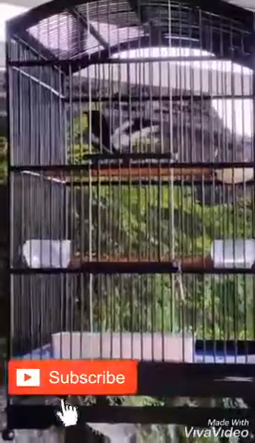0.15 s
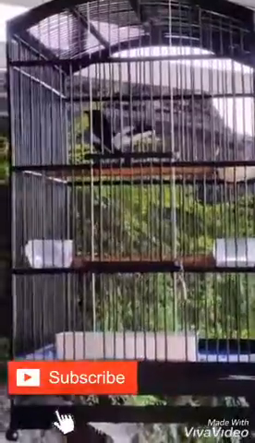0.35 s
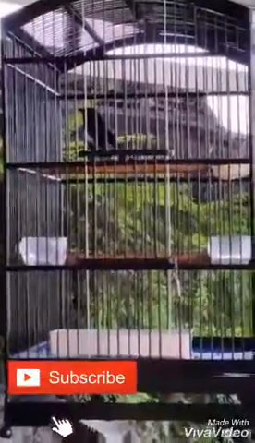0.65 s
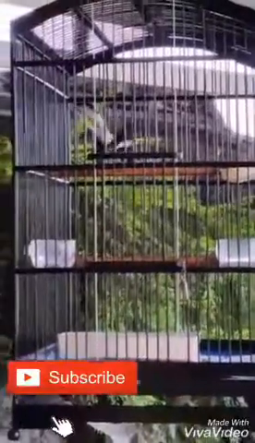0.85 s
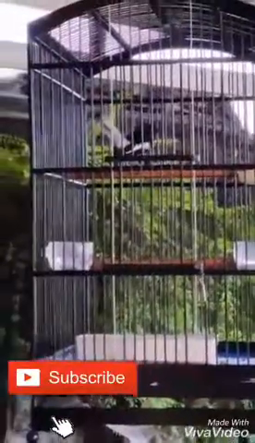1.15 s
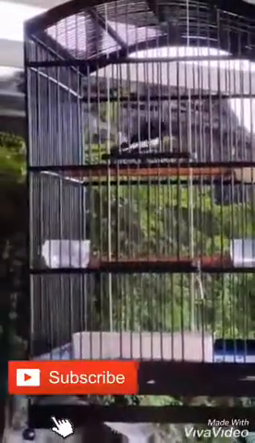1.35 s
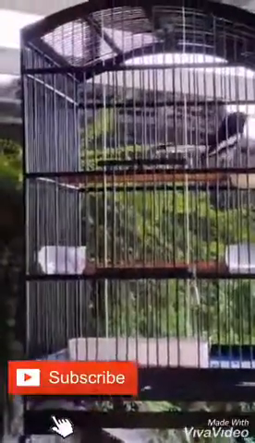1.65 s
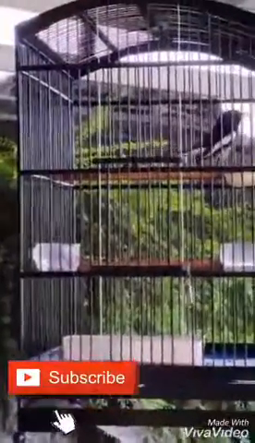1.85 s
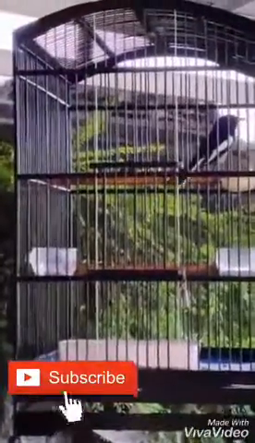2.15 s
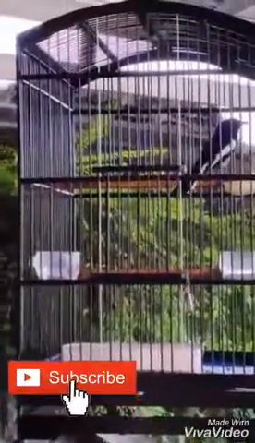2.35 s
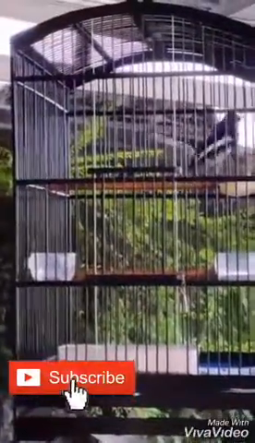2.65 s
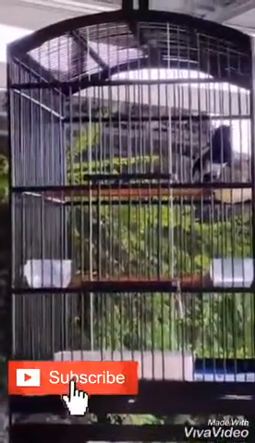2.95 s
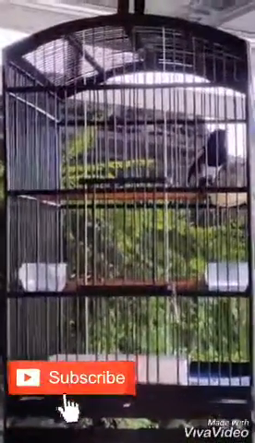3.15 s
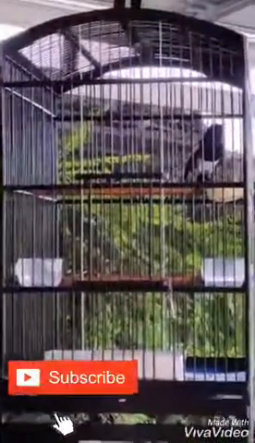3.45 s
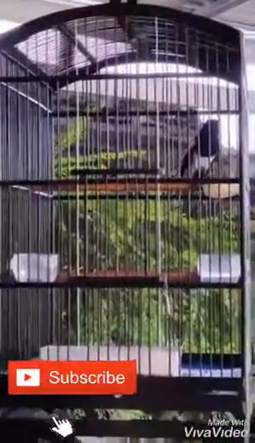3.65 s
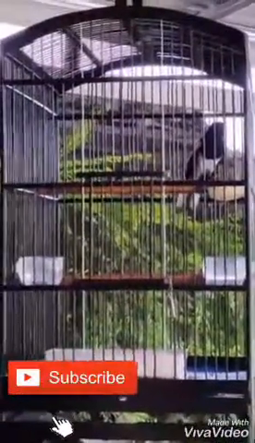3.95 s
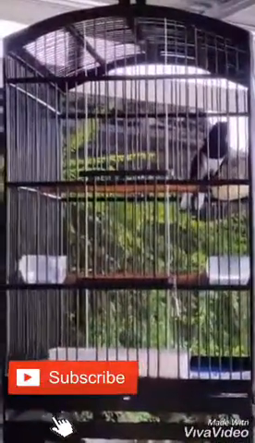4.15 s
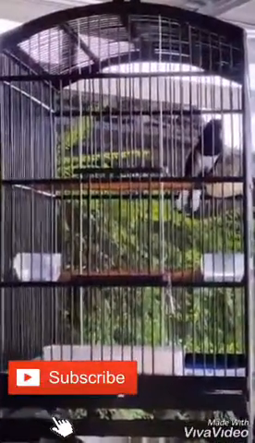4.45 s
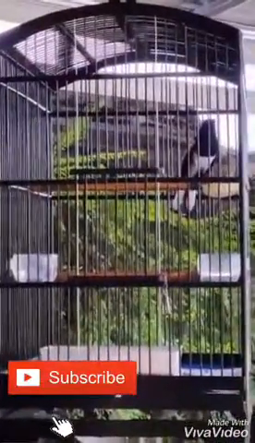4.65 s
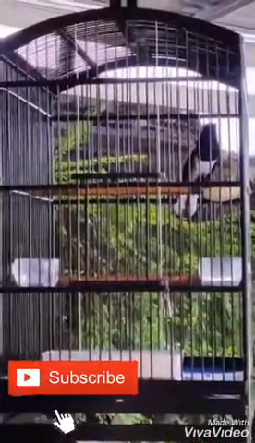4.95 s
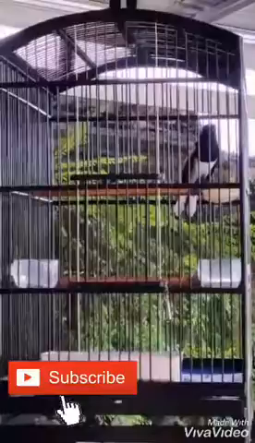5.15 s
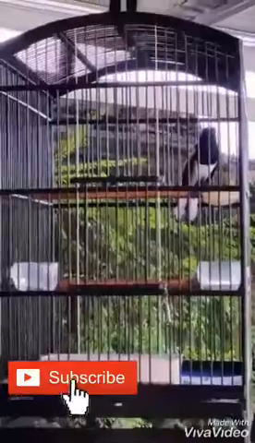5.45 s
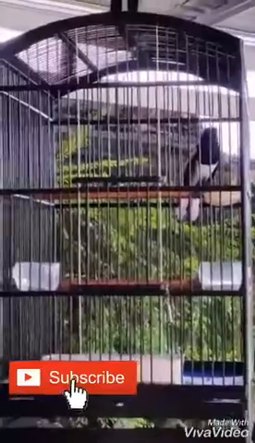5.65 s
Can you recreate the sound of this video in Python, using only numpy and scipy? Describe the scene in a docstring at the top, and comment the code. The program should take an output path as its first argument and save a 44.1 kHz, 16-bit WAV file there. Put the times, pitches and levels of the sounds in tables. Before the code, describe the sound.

A caged songbird on a porch rustles its feathers faintly and gives two soft, hoarse calls. It then sings a quick whistled phrase, a sharp chip and a long high squeal that breaks into a rasp. Two falling slurs and a loud rising whistle follow. Hard walls add a short echo, and a faint low outdoor rumble sinks away in the pauses.

```python
"""A caged songbird sings on a hard-walled porch: a whistled phrase, a sharp chip, a long squeal that
breaks into a rasp, two falling slurs and a rising whistle that ends on two notes at once. Membranes in
its syrinx vibrate and let out puffs of air; in the last note both sides sound and modulate each other.
Two hoarse calls precede the song. Behind it are soft feather rustles, faint, far drawn-out tones and
a low outdoor rumble; a noise suppressor turns the pauses down."""
import sys
import numpy as np
from scipy import signal
from scipy.fft import rfft, irfft, next_fast_len
from scipy.io import wavfile
from scipy.ndimage import uniform_filter1d, minimum_filter1d, map_coordinates

SR = 44100
rng = np.random.default_rng(int(sys.argv[2]) if len(sys.argv) > 2 else 0)


def to_wav(s):
    """Save 16-bit WAV."""
    ch = np.atleast_2d(s).T  # columns
    pcm = np.round(np.clip(ch, -1, 1) * 32767)  # PCM
    wavfile.write(sys.argv[1], SR, pcm.astype(np.int16))


N = 255780
TOP_HZ = 15600

# Clear notes (start [s], length [s], onset [Hz], aim [Hz], end [Hz], level [dB], swell [dB],
# overtones [dB], rasp [0-1])
WHISTLES = [ (1.992, .106, 2485, 3430, 3310, -30, -6.5, -23.5, 0.08),
            (2.15, .11, 2248, 2790, 2569, -23, 1.5, -38.5, 0.13),
            (2.258, .088, 2340, 4338, 4094, -23, -3, -21, .07),
            (2.425, .114, 3337, 3355, 2678, -19.5, 3, -31.5, .18),
            (2.524, .06, 2660, 2248, 2200, -25.5, -1.5, -35, 0.29),
            (5.162, .05, 1500, 1650, 2800, -39, 16, -16, .2),
            (5.196, .134, 2450, 2900, 3280, -25, -3, -15, .08),
            (5.322, .078, 3343, 3582, 3696, -16.5, 5.5, -26.5, 0.03),
            (5.387, .056, 3675, 3654, 3614, -25, -11, -28.5, 0.07), ]
# Three-part chip and two falling slurs (columns as WHISTLES)
CHIPS = [ (3.241, .072, 3900, 5820, 5540, -27, -3, -2, 0.22),
         (3.272, .064, 3300, 4350, 4600, -31, 6, -6, .4),
         (3.304, .032, 5000, 3050, 2506, -29.5, -9.5, -12, 0.79),
         (4.926, 0.069, 6710, 5380, 4055, -29, 5, -8, .09),
         (5.012, .06, 6650, 5556, 3806, -22.5, -9.5, -4.5, .09), ]
# Harsh steps up into the squeal and down out of it (columns as WHISTLES)
RASP_STEPS = [ (3.742, .056, 1196, 1219, 1253, -36, 9, 23, 0.83),
              (3.79, .038, 1476, 1571, 1683, -34, -0.5, 6, .3),
              (3.821, 0.059, 1786, 2266, 2198, -27, 0, 1.5, 0.5),
              (4.243, .09, 2694, 2255, 2192, -25, 1, 1, .28),
              (4.24, .118, 2881, 2690, 2431, -30, -2, -6, .25),
              (4.342, .095, 2011, 1990, 1943, -27.5, -6, 11.5, 0.27),
              (4.382, .075, 2402, 2357, 2286, -32, -7, -5.5, .2),
              (4.443, 0.069, 1716, 1601, 1505, -32.5, 0, 10, .4),
              (4.499, 0.082, 1042, 1080, 1049, -33, -6.5, 20, 0.5), ]
def songbird():
    """The song: clear whistles, shaky chips, harsh steps, the squeal and a two-voiced close."""
    song = sum(syrinx(glide(row, attack_s=.026, release_s=.017), jitter=.05, tremor=.0047,
                      slope_db=-9.5, hiss_db=-8, sizzle_db=-18) for row in WHISTLES)
    song += sum(syrinx(glide(row, attack_s=.02, release_s=.013), jitter=.08, jitter_hz=1400,
                       slope_db=-7.5, hiss_db=-8, sizzle_db=-4) for row in CHIPS)
    song += sum(syrinx(glide(row, attack_s=.0092, release_s=.016), jitter=.03,
                       slope_db=-9, hiss_db=-1, sizzle_db=-19.5) for row in RASP_STEPS)
    return song + squeal() + two_voices()


# Squeal contour (time [s], pitch [Hz], level [dB], overtones [dB])
SQUEAL = [(3.88, 2709, -25.5, 1.2), (3.915, 2747, -24, 6), (3.95, 2813, -21.5, 6.5), (4.0, 2852, -26, 2.5),
          (4.061, 2898, -21, -3), (4.121, 2894, -20.5, -14.5), (4.165, 2854, -17.8, -15),
          (4.201, 2840, -22.5, -16), (4.25, 2855, -24, -14)]
def squeal(bright_db=2.5, mid_rasp=.04, edge_rasp=.34):
    """A long pressed note, cleanest in the middle; at first its octave rivals its fundamental."""
    times, *columns = np.transpose(SQUEAL)
    t = np.arange(int(times[0] * SR), int(times[-1] * SR)) / SR
    pitch, db, overtones_db = (np.interp(t, times, column) for column in columns)
    rasp = mid_rasp + edge_rasp * np.linspace(-1, 1, len(t)) ** 2
    return syrinx((t, pitch, db, overtones_db + bright_db, rasp), tremor=.0034, hiss_db=-6, sizzle_db=-28)


# Closing note, one row per side of the syrinx (columns as WHISTLES)
TWO_VOICES = [(5.441, .05, 3550, 3950, 3990, -17, 0, -30.5, 0.14),
              (5.439, 0.043, 3130, 3060, 3070, -24.5, -3, -16.5, 0.2)]
def two_voices(quadratic_db=14, cubic_db=27):
    """Both sides of the syrinx modulate each other, adding sum and difference tones."""
    first, second = (syrinx(glide(row, attack_s=.02, release_s=.013), hiss_db=-3.5) for row in TWO_VOICES)
    products = first * second * (amp(quadratic_db) + amp(cubic_db) * (first + second))
    colour = [(1000, -29), (2200, 2), (4800, 1), (7000, -.5), (11000, -4.5)]
    return first + second + coloured(products, colour)


# Throat colour of the overtones (frequency [Hz], gain [dB])
THROAT = [(1000, -15), (2000, -11), (3000, -1), (4300, 6.5), (5700, -0.5), (7000, -3), (8500, -12.5),
          (11000, -14), (13300, -9), (15000, -22.5)]
# Rasp noise (frequency [Hz], relative density [dB])
HISS = [(200, -46.5), (1200, -23), (2300, 2.5), (4300, -3), (6500, -14), (9000, -13), (12500, -4.5),
        (16000, -17)]
# Treble noise of pressed notes (frequency [Hz], relative density [dB])
SIZZLE = [(3000, -41.5), (7000, -23), (8700, 1), (11000, 1.5), (13200, 3), (15000, -13)]
def syrinx(controls, jitter=.035, jitter_hz=700, tremor=.0033, shimmer_db=6,
           slope_db=-11, hiss_db=-3, sizzle_db=-25):
    """One note of a vibrating membrane; rasp shakes its pitch and strength and admits pulsed noise."""
    t, pitch, db, overtones_db, rasp = controls
    rasp = np.clip(rasp, 0, 1)
    unsteady = tremor * wobble(250, len(t)) + jitter * rasp * wobble(jitter_hz, len(t))
    phase = 2 * np.pi * np.cumsum(pitch * (1 + unsteady)) / SR
    k = np.arange(2, 15)[:, None]
    gains = amp(overtones_db + slope_db * np.log2(k / 2) + along(THROAT, k * pitch))
    gains *= k * pitch < TOP_HZ
    overtones = np.sum(gains * np.sin(k * phase), axis=0)
    overtone_power = np.sum(gains ** 2, axis=0)
    tone = (np.sin(phase) + overtones) / np.sqrt((1 + overtone_power) / 2)
    flutter = amp(shimmer_db * rasp * wobble(400, len(t)))
    puffs = rng.standard_normal((2, len(t))) * (1 + np.sin(phase))  # air escapes once a cycle
    hiss = amp(hiss_db) * rasp ** 2 * unit(coloured(puffs[0], HISS))
    pressed = np.sqrt(overtone_power / (1 + overtone_power))
    sizzle = amp(sizzle_db) * pressed * unit(coloured(puffs[1], SIZZLE))
    voice = flutter * (tone + sizzle) + hiss
    return placed(gate(t, fade_s=.0026) * amp(db) * voice, t)


def glide(row, attack_s, release_s, scoop_s=.014, edge_rasp=.22):
    """Syrinx controls: a scoop from onset to aim, a slide to the end pitch, roughest at the edges."""
    start, length, onset_hz, aim_hz, end_hz, db, swell_db, overtones_db, rasp = row
    t, u, edges_db = syllable(start, length, attack_s, release_s)
    scoop_hz = (onset_hz - aim_hz) * np.exp(-(t - start) / scoop_s)
    pitch = aim_hz + (end_hz - aim_hz) * u + scoop_hz
    level_db = db + swell_db * (u - .5) + edges_db
    return t, pitch, level_db, overtones_db, rasp + edge_rasp * (2 * u - 1) ** 2


# Hoarse calls (start [s], length [s], level [dB])
HOARSE_CALLS = [(.508, .112, -36), (1.299, .104, -37.5)]
# Their colour (frequency [Hz], gain [dB])
HOARSE_COLOUR = [(300, -30), (700, -43.5), (950, 9.5), (1200, 10.5), (1600, 10.5), (2000, 7.5), (2600, 1),
                 (3300, -18), (4500, -32.5), (7000, -37.5), (12000, -21), (16000, -50.5)]
def hoarse_call(start, length, db, start_hz=863, end_hz=799, overtones_db=10, rasp=.39, end_rasp=.85):
    """A soft, low call that sags in pitch and grows harsher."""
    t, u, edges_db = syllable(start, length, attack_s=.04, release_s=.034)
    pitch = start_hz + (end_hz - start_hz) * u
    controls = t, pitch, db + edges_db, overtones_db, rasp + (end_rasp - rasp) * u
    voice = syrinx(controls, jitter=.0998, jitter_hz=500, slope_db=-5, hiss_db=0)
    return coloured(voice, HOARSE_COLOUR)


# Hops and wing settling (start [s], length [s], level [dB], fade [dB])
RUSTLES = [(0, 0.29, -59, -20), (1.528, .4, -64, -15.5)]
# Feather noise (frequency [Hz], relative density [dB])
FEATHERS = [(300, -6.5), (900, 4), (2500, -2), (4500, -12.5), (9000, -20.5), (15000, -23.5)]
def rustle(start, length, db, fade_db, flicker_db=2):
    """A soft, flickering brush of feathers that dies away."""
    t, u, edges_db = syllable(start, length, attack_s=.008, release_s=.05)
    noise = unit(coloured(rng.standard_normal(len(t)), FEATHERS))
    level_db = db + fade_db * u + edges_db + flicker_db * wobble(40, len(t))
    return placed(noise * amp(level_db), t)


# Far calls (start [s], length [s], start [Hz], middle [Hz], end [Hz], level [dB])
FAR_TONES = [ (.85, .45, 1620, 1745, 1705, -67), (1.69, .13, 950, 965, 955, -66),
             (1.72, .32, 650.5, 664.6, 690, -57), (2.02, .28, 696, 733, 776, -56.5),
             (3.66, 0.14, 463, 483.4, 494, -50.5), (3.95, .25, 481, 512.7, 503, -56),
             (4.24, 0.27, 495.3, 499, 508, -56.5), (4.98, .6, 545, 495, 425, -61), ]
def far_tone(start, length, start_hz, middle_hz, end_hz, db, waver=.025):
    """A distant, drawn-out call of which only one wavering partial carries."""
    t, u, edges_db = syllable(start, length, attack_s=.07, release_s=.098)
    arch_hz = (middle_hz - (start_hz + end_hz) / 2) * np.sin(np.pi * u)
    pitch = start_hz + (end_hz - start_hz) * u + arch_hz
    phase = 2 * np.pi * np.cumsum(pitch * (1 + waver * wobble(90, len(t)))) / SR
    return placed(np.sqrt(2) * gate(t, fade_s=.015) * amp(db + edges_db) * np.sin(phase), t)


# Outdoor rumble (frequency [Hz], relative density [dB])
RUMBLE = [(12, -49), (20, -12), (27, -15), (54, -1.5), (70, 1.5), (156, -3.5), (216, -7.5), (275, -18),
          (400, -22), (520, -36), (880, -120)]
# Air noise (frequency [Hz], relative density [dB])
AIR = [(100, -20), (280, -12), (600, -9.5), (1000, -16), (2500, -30), (4500, -39), (8300, -43),
       (15000, -49.5)]
def outdoors(rumble_db=-53, air_db=-62, drift_db=1.25):
    """A nearly mono, drifting rumble under wide, faint air noise."""
    def noise(spectrum, side_db):
        mid, side = coloured(rng.standard_normal((2, N)), spectrum)
        return unit(np.array([mid + amp(side_db) * side, mid - amp(side_db) * side]))
    rumble = amp(rumble_db + drift_db * wobble(3.2, N)) * noise(RUMBLE, side_db=-21)
    return rumble + amp(air_db) * noise(AIR, side_db=-4)


# Porch decay (frequency [Hz], t60 [s])
PORCH_T60 = [(300, 0.64), (2500, 0.39), (5000, 0.43), (9000, 0.23), (15000, 0.25)]
def porch(x, early_db=3, early_t60_s=.13, build_up_s=.0057):
    """Wall reflections build up, then fade, treble first; each channel hears its own."""
    hz, t, noise = signal.stft(rng.standard_normal((2, int(.7 * SR))), SR, nperseg=256)
    decay = amp(-60 * t / along(PORCH_T60, hz)[:, None]) + amp(early_db - 60 * t / early_t60_s)
    decay *= 1 - np.exp(-t / build_up_s)
    decay /= np.linalg.norm(decay, axis=1, keepdims=True)  # equal energy per band
    tail = signal.istft(noise * decay, SR, nperseg=256)[1]
    tail /= np.linalg.norm(tail, axis=1, keepdims=True)
    return signal.fftconvolve(x[None], tail, axes=1)[:, :N]


# Suppression in the pauses (frequency [Hz], cut [dB])
SUPPRESSION = [(100, 10), (400, 13.5), (1000, 19), (3000, 9), (10000, 7)]
def suppressor(x, shut_db=-50, open_db=-22, hold_s=.13):
    """A noise suppressor turns quiet moments down, opens with loud sound and holds briefly."""
    hz, t, bands = signal.stft(x, SR, nperseg=512)
    power = np.abs(uniform_filter1d(np.mean(x ** 2, axis=0), size=1024))
    level_db = 10 * np.log10(np.interp(t, np.arange(N) / SR, power) + 1e-12)
    reach = max(1, int(hold_s / t[1] / 2))
    held_db = -minimum_filter1d(-level_db, 2 * reach + 1, origin=reach)  # peak hold
    shut = uniform_filter1d(np.clip((open_db - held_db) / (open_db - shut_db), 0, 1), size=5)
    cut_db = along(SUPPRESSION, hz)[:, None] * shut
    return signal.istft(bands * amp(-cut_db), SR, nperseg=512)[1][:, :N]


def syllable(start, length, attack_s, release_s, edge_db=-17.5):
    """Sample times [s], progress u [0-1] and attack-hold-release envelope [dB] of a note."""
    t = np.arange(int(length * SR)) / SR
    attack = np.clip(1 - t / attack_s, 0, 1) ** 2
    release = np.clip(1 - (length - t) / release_s, 0, 1) ** 2
    return start + t, t / length, edge_db * (attack + release)


def gate(t, fade_s):
    """Linear fade in and out over the times t."""
    return np.clip(np.minimum(t - t[0], t[-1] - t) / fade_s, 0, 1)


def placed(x, t):
    """A note set at its time in silence."""
    return np.pad(x, (round(t[0] * SR), N))[:N]


def amp(db):
    """Decibels to gain."""
    return 10 ** (np.asarray(db) / 20)


def unit(x):
    """Scale to rms 1."""
    return x / np.sqrt(np.mean(x ** 2) + 1e-20)


def along(points, hz):
    """(frequency [Hz], value) points read on a log axis."""
    knots_hz, values = np.transpose(points)
    return np.interp(np.log(hz + 1), np.log(knots_hz + 1), values)


def wobble(rate_hz, n):
    """A smooth random curve of n samples, rate_hz knots a second."""
    knots = rng.standard_normal(int(n * rate_hz / SR) + 4)
    return map_coordinates(knots, [np.arange(n) * rate_hz / SR])


def filtered(x, gain):
    """x times a gain that depends on frequency."""
    n = x.shape[-1]
    size = next_fast_len(n + 4096)
    return irfft(rfft(x, size) * gain(np.fft.rfftfreq(size, 1 / SR)), size)[..., :n]


def coloured(x, points):
    """x through a (frequency [Hz], gain [dB]) curve."""
    return filtered(x, lambda hz: amp(along(points, hz)))


# Direct path, bird facing away (frequency [Hz], gain [dB])
BEAK_SHADOW = [(2500, -3.5), (4000, -1.5), (6000, -6.5), (9000, -12), (14000, -19.5)]
def scene(direct_db=-2.5, room_db=-1, hoarse_direct_db=-6):
    """Song and calls arrive direct and off the walls; rustles and far tones only as reflections."""
    song = songbird()
    hoarse = sum(hoarse_call(*row) for row in HOARSE_CALLS)
    faint = sum(far_tone(*row) for row in FAR_TONES) + sum(rustle(*row) for row in RUSTLES)
    direct = amp(direct_db) * coloured(song, BEAK_SHADOW) + amp(hoarse_direct_db) * hoarse
    return direct + porch(amp(room_db) * song + hoarse + faint) + outdoors()


# Microphone port responses (frequency [Hz], gain [dB])
LEFT_PORT = [(1000, 0), (2700, 0.5), (3600, -1), (5000, -9.5), (9000, 1), (14000, -3.5)]
RIGHT_PORT = [(1000, 0), (2700, -.5), (3600, -3.5), (5000, -1.5), (9000, 7), (14000, 3.5)]
def record(dry):
    """Two microphone ports, the left shaded in the treble, then the suppressor and the band limit."""
    ports = np.array([coloured(dry[0], LEFT_PORT), coloured(dry[1], RIGHT_PORT)])
    return filtered(suppressor(ports), lambda hz: hz < TOP_HZ)


dry = scene()
out = record(dry)
to_wav(out)
```